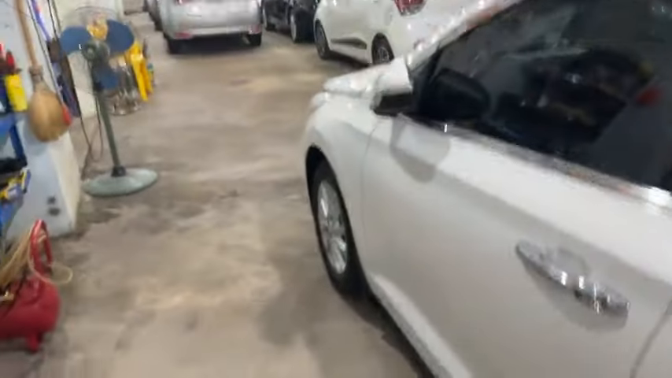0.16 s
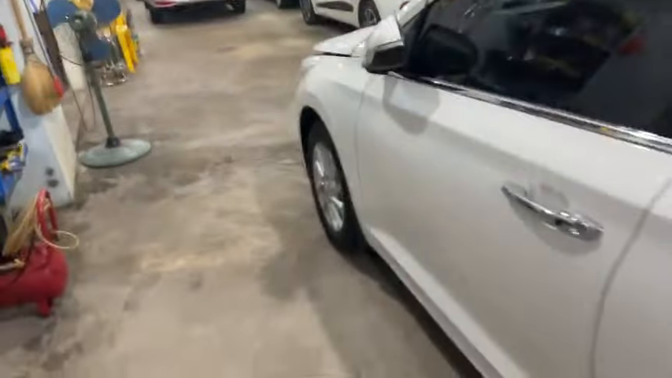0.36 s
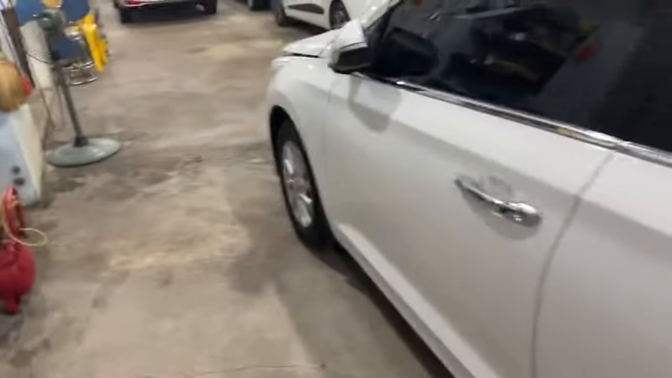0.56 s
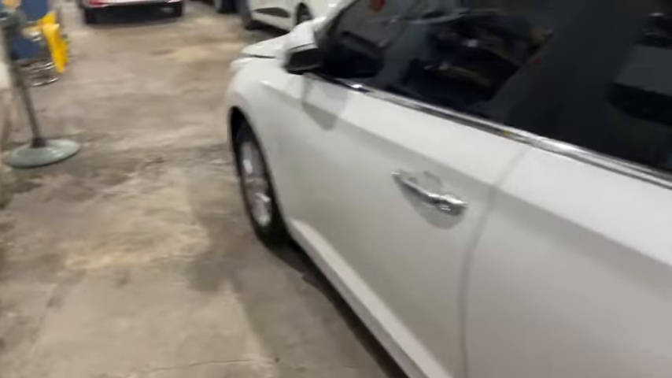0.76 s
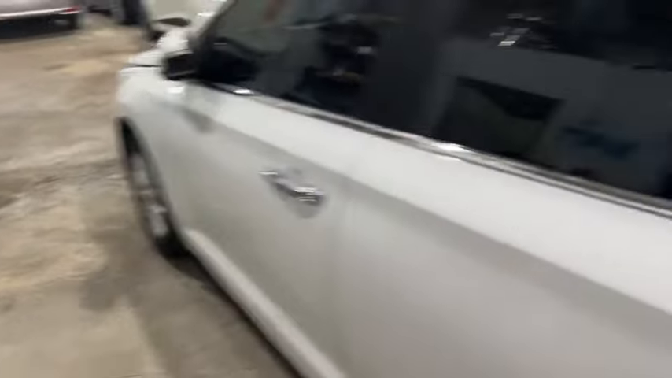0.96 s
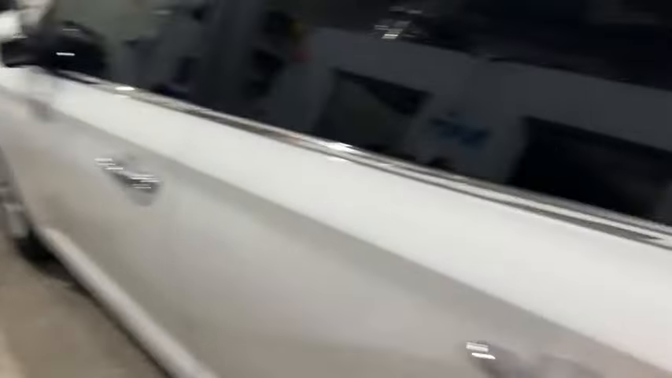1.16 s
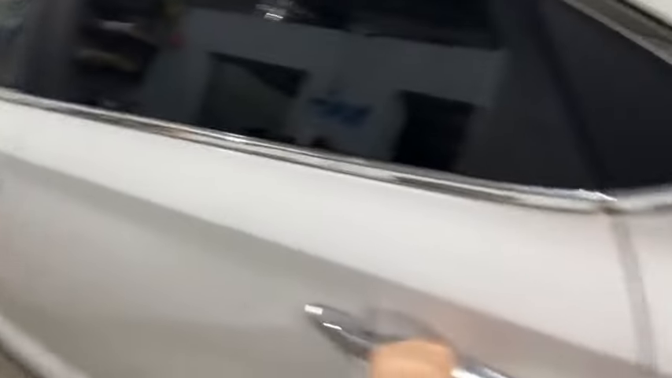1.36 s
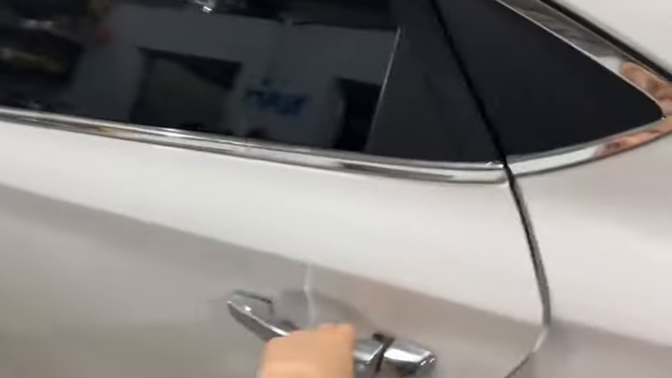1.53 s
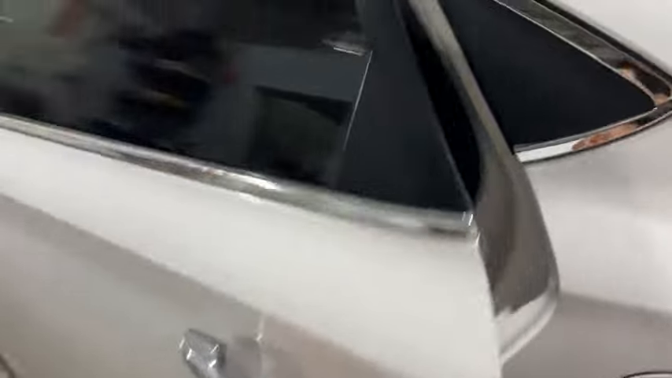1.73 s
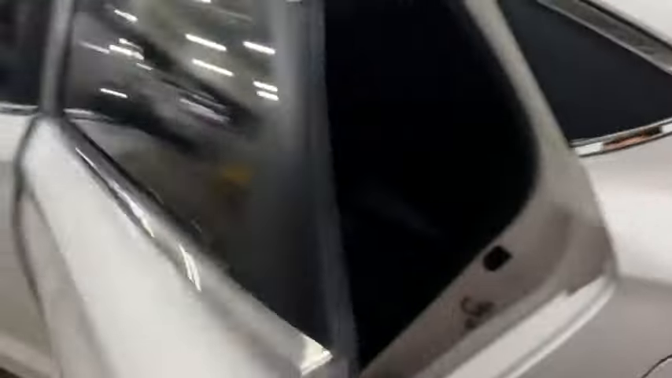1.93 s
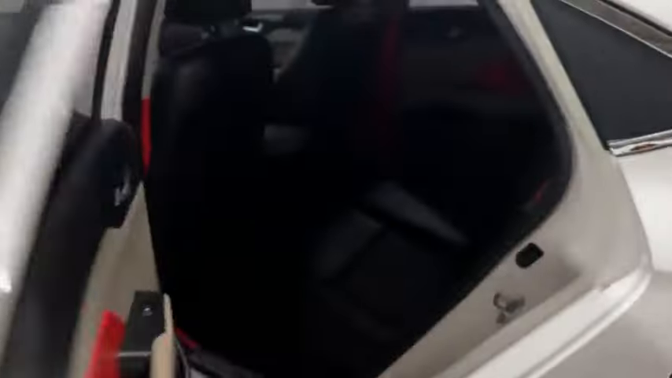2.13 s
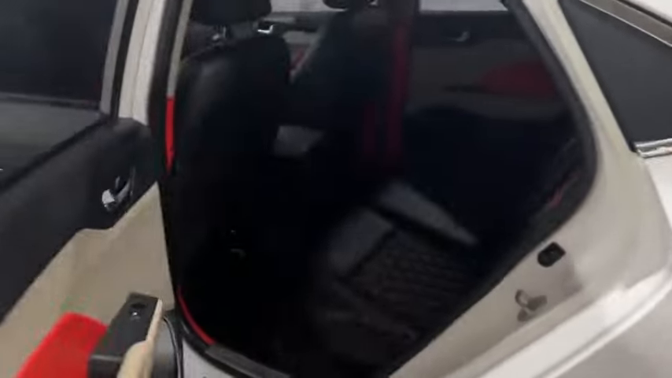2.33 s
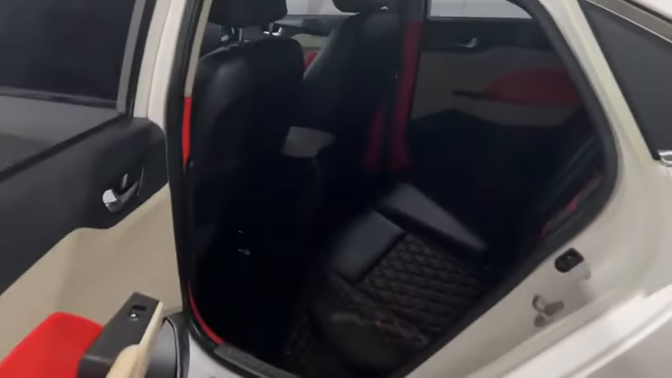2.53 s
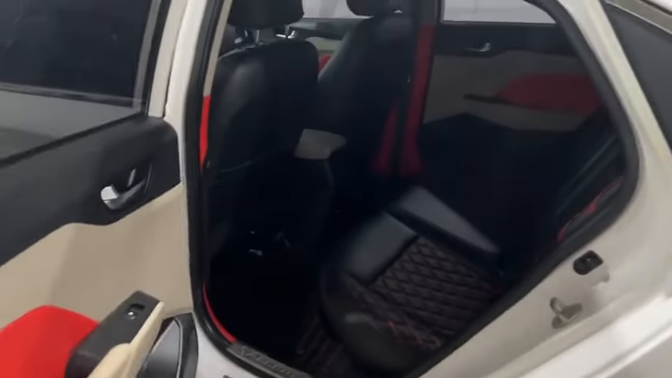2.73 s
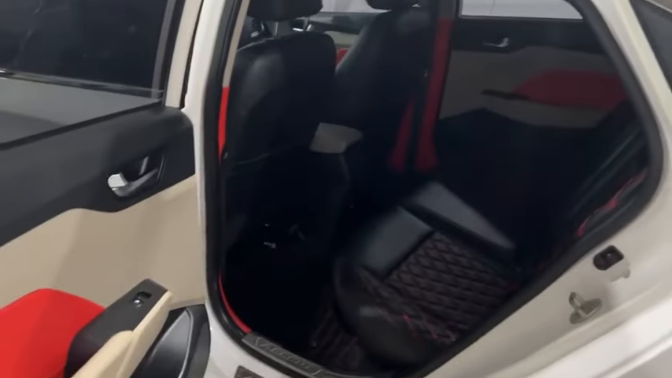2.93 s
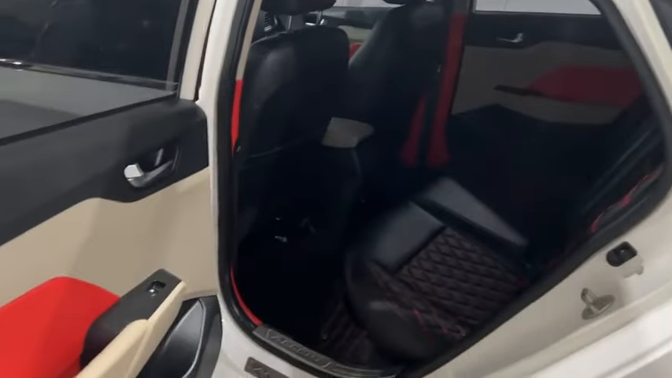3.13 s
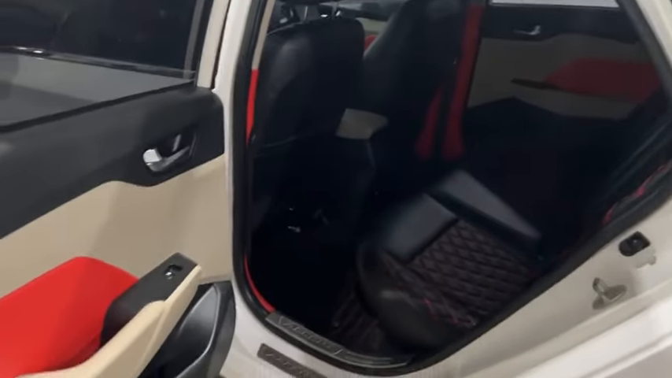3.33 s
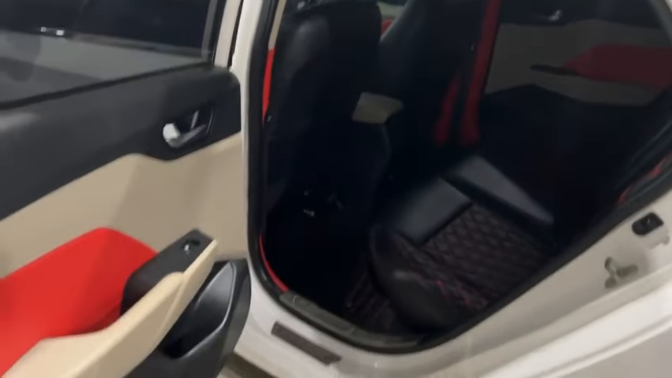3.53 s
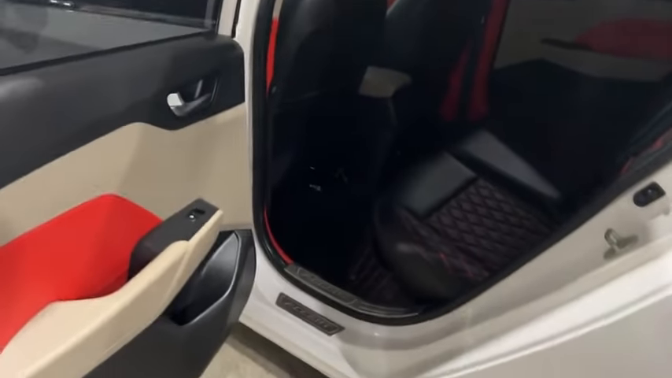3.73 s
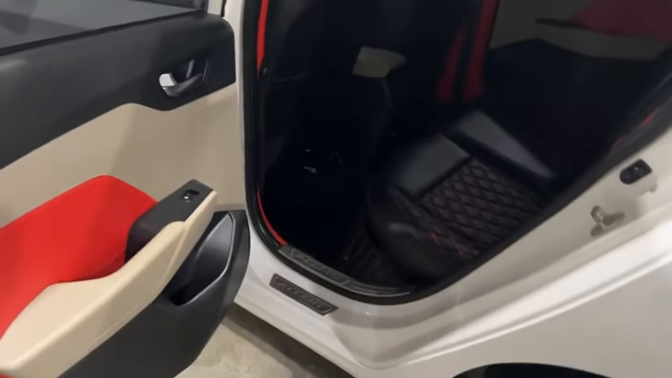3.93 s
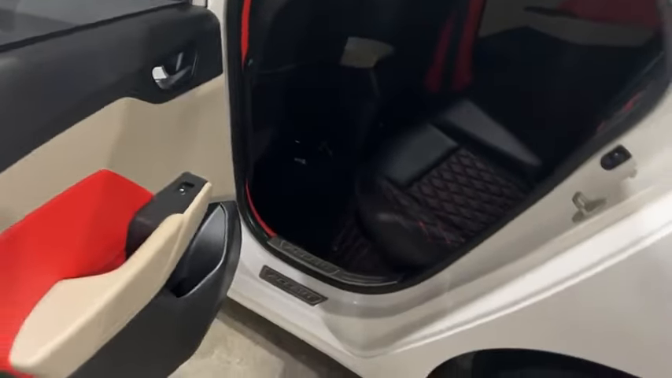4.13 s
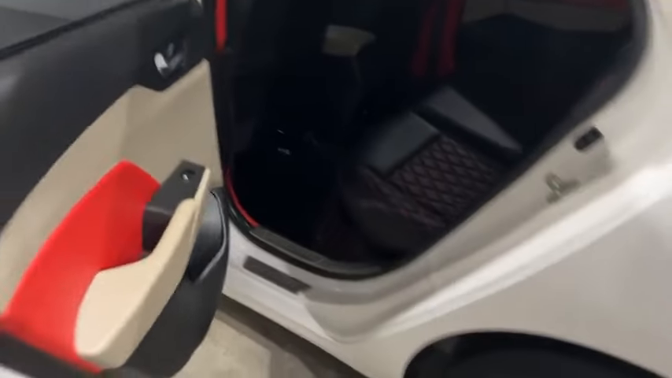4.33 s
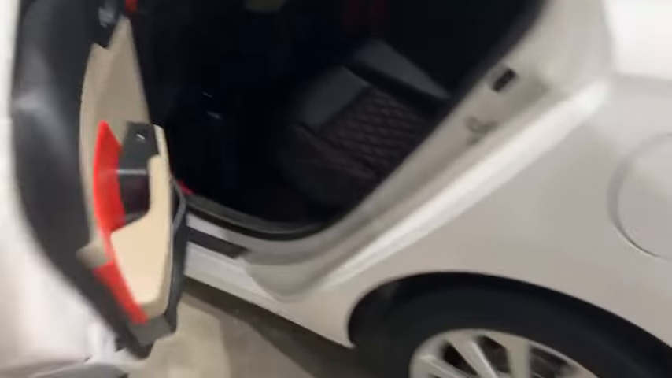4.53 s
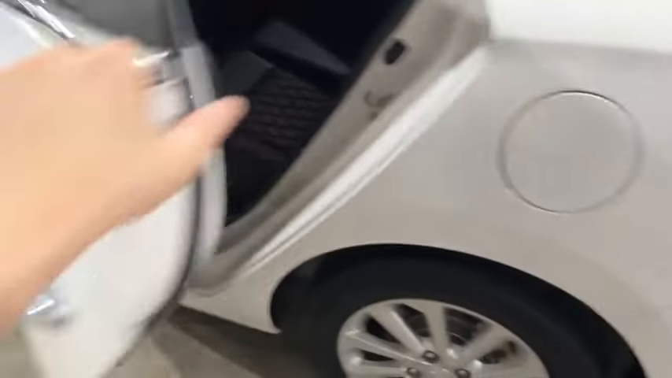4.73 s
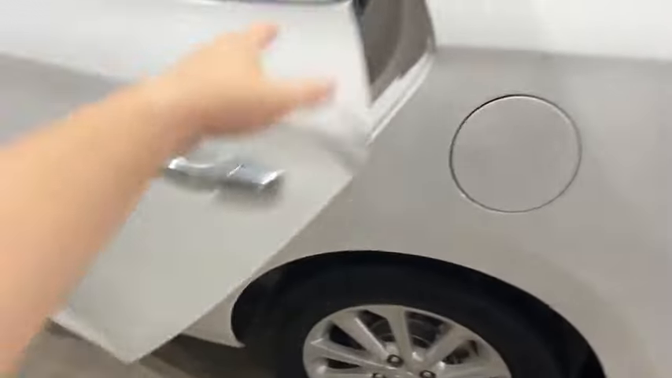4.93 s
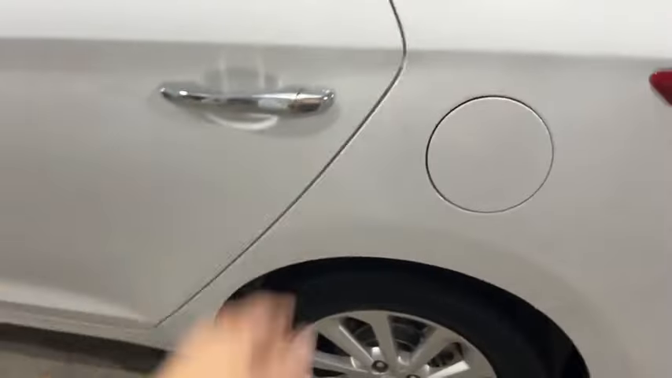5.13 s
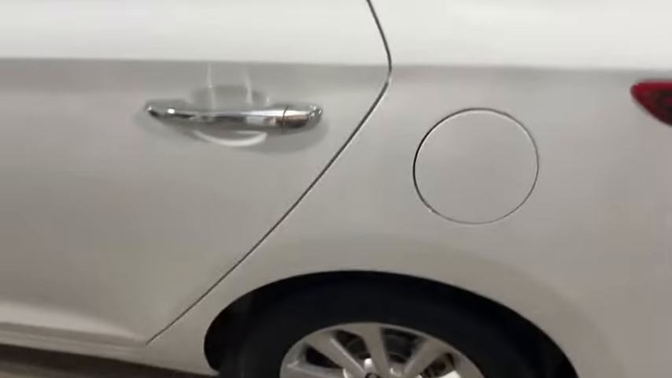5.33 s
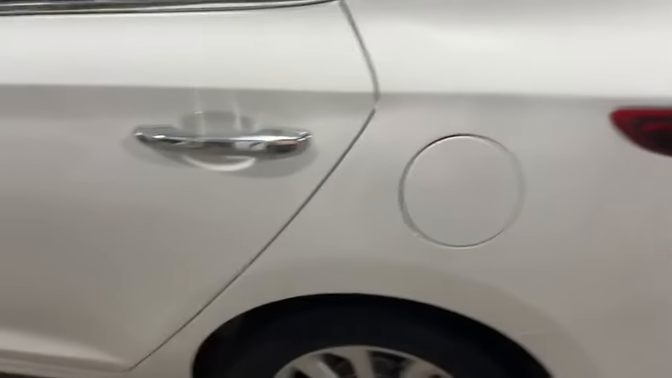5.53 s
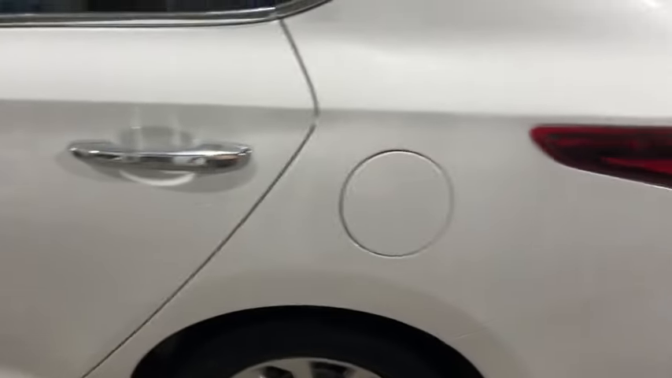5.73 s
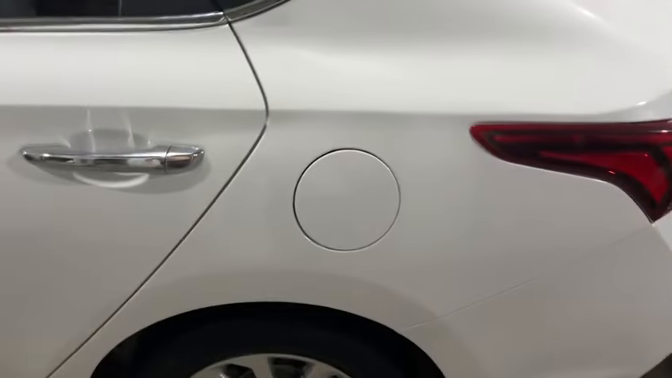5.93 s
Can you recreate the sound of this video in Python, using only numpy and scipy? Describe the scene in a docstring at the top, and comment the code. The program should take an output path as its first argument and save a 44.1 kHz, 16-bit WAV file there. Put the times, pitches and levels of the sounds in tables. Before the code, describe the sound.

A car door thuds shut in a covered lot; another unlatches, clacks against its stop, then slams harder with a bright metallic latch snap.

```python
"""Car doors in a covered lot

A car's front door is shut; the rear door is unlatched, swings against its stop and is slammed.
Each slam is the same quick run of blows (seal, latch, frame), stretched when the door moves slower.
Blows ring dying sines in the metal, crack noise in the trim and latch, and stir a diffuse echo of the hall.
The hinge rubs with band noise and groans with two climbing partials.
Behind them are a sine hum that comes and goes, the noise wash of the hall, faint high noise and a thin hiss."""
import sys
import numpy as np
from scipy import signal
from scipy.fft import rfft, irfft, next_fast_len
from scipy.io import wavfile
from scipy.ndimage import uniform_filter1d

SR = 44100
rng = np.random.default_rng(int(sys.argv[2]) if len(sys.argv) > 2 else 0)


def store_wav(level_fs):
    """Save 16-bit WAV to argv[1]."""
    pcm = np.round(np.clip(np.atleast_2d(level_fs), -1, 1) * 32767)
    wavfile.write(sys.argv[1], SR, pcm.T.astype(np.int16))


N = 267687
TIME = np.arange(N) / SR  # s

# front door, then rear door: (latch catches at t/s, time stretch, push trim/dB, clatter trim/dB, click trim/dB)
SLAMS = [(.0492, 1.25, -2.5, -1.5, -2.5), (5.2858, 1.0, 0.5, 0.2, 1)]


def amp(db):
    """Decibels to gain."""
    return 10 ** (np.asarray(db) / 20)


def evened(x):
    """Scales to rms 1."""
    return x / np.sqrt(np.mean(x ** 2) + 1e-20)


def read(points, hz):
    """Reads a table of (f/Hz, value) along a log-frequency axis."""
    f, value = np.transpose(points)
    return np.interp(np.log(hz + 1), np.log(f + 1), value)


def add(mix, s, sound):
    """Mixes a sound in at s seconds."""
    part = mix[max(round(s * SR), 0):][:len(sound)]
    part += sound[:len(part)]


def noise(gain):
    """Noise of rms 1 whose spectrum is the function gain(Hz)."""
    size = next_fast_len(N)
    spectrum = rfft(rng.standard_normal(size))
    shaped = spectrum * gain(np.fft.rfftfreq(size, 1 / SR))
    return evened(irfft(shaped, size)[:N])


def drift(width_hz):
    """Random wander of rms 1, its speed set by the width of its low-pass."""
    return noise(lambda f: np.exp(-(f / width_hz) ** 2))


def swells(rows, rise_s, fall_s):
    """Gain of sounds that ease in, hold and ease out; rows are (start/s, length/s, level/dB)."""
    def ease(u):
        return np.sin(np.pi / 2 * np.clip(u, 0, 1)) ** 2
    return sum(amp(db) * ease((TIME - s) / rise_s) * ease((s + length - TIME) / fall_s)
               for s, length, db in rows)


def wash():
    """Steady noise wash of the hall with a slight flutter in level."""
    # colour of the wash ahead of its treble roll-off: (f/Hz, level/dB)
    wash_colour = [(15, -42), (25, -35), (35, -16), (54, -4), (106, 3.5), (128, -10), (257, -4), (475, -13),
                   (1030, -16.5), (3260, -26), (5010, -12), (6200, -37), (7480, -26), (8550, -43),
                   (15000, -62)]
    rumble = noise(lambda f: amp(read(wash_colour, f)) / (1 + (f / 3800) ** 6))
    return amp(-57.5) * rumble * amp(0.26 * drift(20))


def side_noise():
    """Brighter noise along the car's side; it sinks as the listener steps behind the open door."""
    # colour of the side noise: (f/Hz, level/dB)
    side_colour = [(40, -47), (90, -6), (270, 3), (500, -6.5), (1000, -8), (1800, -16.5), (3000, -24.5),
                   (6000, -26.5), (9000, -46.5), (14000, -54)]
    start_s, takes_s, drop_db = 1.61, 2.05, -11
    screened = np.clip((TIME - start_s) / takes_s, 0, 1)
    level = amp(-50.5 + drop_db * screened + 1.4 * drift(34))
    return level * noise(lambda f: amp(read(side_colour, f)))


def hum():
    """A low sine with wandering phase; swells rise over a quiet floor."""
    # swells of the hum: (start/s, length/s, level/dB)
    hum_swells = [(-.05, .45, -44.5), (.4, 0.19, -43), (.53, 0.696, -47.5), (1.37, 0.69, -55.5)]
    tone = evened(np.sin(2 * np.pi * 57.5 * TIME + 0.5 * drift(4.8)))
    return (amp(-66) + swells(hum_swells, rise_s=0.11, fall_s=0.2)) * tone


def drone():
    """Machinery far off: very narrow bands of low noise."""
    # bands of the machinery: (f/Hz, level/dB)
    drone_bands = [(84, -66), (167, -66.5), (255, -67.5)]
    return sum(amp(db) * noise(lambda f: np.exp(-((f - hz) / 7) ** 2)) for hz, db in drone_bands)


def hiss():
    """A thin, high hiss: bell-shaped bands of noise."""
    # bands of the hiss: (f/Hz, spread/Hz, level/dB)
    hiss_bands = [(4920, 372, -65), (7390, 333, -64.5), (9430, 280, -86)]
    return sum(amp(db) * noise(lambda f: np.exp(-.5 * ((f - hz) / spread) ** 2))
               for hz, spread, db in hiss_bands)


def high_noise():
    """Faint noise around 12 kHz that swells and fades over a lower floor."""
    # the swells: (start/s, length/s, level/dB)
    high_noise_swells = [(.09, .33, -77), (.83, 0.33, -73), (1.55, .27, -76), (2.1, 0.39, -74),
                         (2.86, .27, -89)]
    treble = noise(lambda f: np.exp(-((f - 12000) / 3500) ** 2))
    return (amp(-95) + swells(high_noise_swells, rise_s=0.13, fall_s=0.16)) * treble


def background():
    """Everything that sounds behind the doors."""
    return wash() + side_noise() + hum() + drone() + hiss() + high_noise()


def colour(x, spectrum, size=4096):
    """Minimum-phase filter with the given spectrum, so that attacks stay sharp."""
    log_gain = np.log(amp(read(spectrum, abs(np.fft.fftfreq(size, 1 / SR)))))
    taps = np.fft.ifft(np.exp(np.conj(signal.hilbert(log_gain)))).real
    return signal.oaconvolve(x, taps[:size // 2])[:N]


def ring(force, modes):
    """Dying sines set off by a force; the rubber seal and trim choke their late ring."""
    t = TIME[:SR]
    free = sum(amp(db) * np.exp(-np.log(1000) * t / t60) * np.sin(2 * np.pi * hz * t)
               for hz, db, t60 in modes)
    choke_s = .2
    return signal.oaconvolve(force, free * np.exp(-(t / choke_s) ** 2))[:N]


def burst(decay_s, after_db, after_s, rise_s, size=8192):
    """A grainy crack of noise followed by a weaker, lumpy rattle; energy 1."""
    t = TIME[:size]
    lumps = amp(3.5 * evened(uniform_filter1d(rng.standard_normal(size), size=110)))
    fade = np.exp(-t / decay_s) + amp(after_db) * np.exp(-t / after_s)
    shape = fade * (1 - np.exp(-t / rise_s)) * lumps
    return rng.standard_normal(size) * shape / np.linalg.norm(shape)


def door(blows, modes, rattle_s, click_s, steel_db, bright_hz):
    """Every blow pushes the panel, shakes the trim and clicks the latch."""
    # colour of the trim's clatter: (f/Hz, level/dB)
    clatter_colour = [(40, -40.5), (150, 1.5), (330, 3.5), (480, -1.5), (780, -1.5), (980, -5.5),
                      (1400, -14), (1900, -18.5), (2800, -17.5), (4300, -23.5), (6500, -28.5),
                      (9000, -46.5), (15000, -59)]
    # colour of the latch's click: (f/Hz, level/dB)
    click_colour = [(200, -34), (1200, 2.5), (3000, -12), (5500, -5), (7000, -10), (9500, -16.5),
                    (11000, -28.5), (16000, -37)]
    # ring of the latch's steel: (f/Hz, level/dB, t60/s before the choke)
    latch_modes = [(2760, -21, 0.086), (3030, -36, 0.088), (2850, -21, 0.11), (4430, -18.5, 0.044)]
    push, trim, click, steel = np.zeros((4, N))
    t = TIME[:2048]
    for s, push_db, contact_ms, trim_db, click_db in blows:
        u = t * 1000 / (contact_ms / 2)  # the push peaks at half the contact time
        pulse = u * np.exp(-u)  # a longer contact reaches only the low modes
        add(push, s, amp(push_db) * pulse / pulse.sum())
        add(trim, s, amp(trim_db) * burst(decay_s=rattle_s, after_db=-11, after_s=0.045, rise_s=0.0005))
        add(click, s, amp(click_db) * burst(decay_s=click_s, after_db=-19.5, after_s=0.043, rise_s=0.00073))
        add(steel, s, amp([click_db]))  # a single-sample tap
    panel = ring(push, modes) + amp(25) * colour(trim, clatter_colour)
    latch = amp(13) * colour(click, click_colour) + amp(steel_db) * ring(steel, latch_modes)
    # the door's edge shades the latch's treble
    shade = signal.butter(2, min(bright_hz, 20000), fs=SR, output="sos")
    return panel + signal.sosfilt(shade, latch)


def shut(s, stretch, push_db, trim_db, click_db):
    """The blows of one slam: the shared stages at this door's pace and strength."""
    # seal touches, latch catches, rides over the striker, door seats, latch snaps home, frame takes the load,
    # door rocks back: (t/s from the catch, unstretched, push/dB, contact/ms, trim clatter/dB, latch click/dB)
    stages = [(-.0105, -23.5, 0.71, -18, -46), (0, -11, 0.17, -4, -19), (.0032, -7.5, 0.36, -5.5, -23),
              (.0082, 0.5, 0.71, -28, -34), (0.0243, -15.5, 0.22, -9.5, -14.5), (.032, -5.5, 1, -15.5, -26),
              (0.0379, -10, 5.8, -14.5, -28)]
    return [(s + stretch * after_s, push + push_db, contact_ms, trim + trim_db, click + click_db)
            for after_s, push, contact_ms, trim, click in stages]


def front_slam():
    """The front door shuts at a slower pace, its latch well shaded."""
    # ring of the front door and the cabin behind it: (f/Hz, level/dB, t60/s before the choke)
    front_modes = [(51, -22, 0.62), (71.3, -25, 0.45), (92.4, -22, 0.41), (130.2, -20.5, 0.31),
                   (163, -28, 0.42), (247.4, -24, 0.7), (290, -25.5, 0.12), (329, -19.5, 0.15),
                   (401, -20, 0.31), (523, -23, 0.12), (670, -13.5, 0.047), (770, -24, 0.09),
                   (853, -30, 0.13), (1070, -31, .1)]
    return door(shut(*SLAMS[0]), front_modes, rattle_s=0.0056, click_s=0.014, steel_db=-17, bright_hz=7040)


def hall(x):
    """A diffuse tail that builds up briefly, each band dying at its own speed."""
    # decay of the hall: (f/Hz, t60/s)
    hall_decay = [(50, 0.93), (150, 0.66), (400, 0.7), (1000, 0.78), (2500, 1), (6000, 0.82), (14000, 0.41)]
    # colour of the echo: (f/Hz, level/dB)
    echo_colour = [(40, -18), (120, -8.5), (300, -11.5), (900, -12.5), (2500, -12), (6000, -6.5),
                   (14000, -5)]
    hz, t, z = signal.stft(rng.standard_normal(SR), SR, nperseg=512)
    t60 = read(hall_decay, hz)[:, None]
    even_energy = np.sqrt(2 * np.log(1000) / (t60 * SR))  # long bands get no extra energy
    fade = np.exp(-np.log(1000) * t / t60) * even_energy
    bands = z * fade * amp(read(echo_colour, hz))[:, None]
    tail = signal.istft(bands, SR, nperseg=512)[1][:SR]
    build_up = 1 - np.exp(-TIME[:SR] / 0.0044)
    return signal.oaconvolve(x, tail * build_up)[:N]


def bumps():
    """Light knocks push the rear panel but hardly shake the trim or the latch."""
    # the knocks: (t/s, push/dB, contact/ms)
    knocks = [(2.163, -22.5, 1.4), (2.61, -22, 5.6), (2.809, -39, 4.2), (5.605, -28.5, 3.5)]
    trim_db, click_db = -52, -64
    return [(s, db, contact_ms, trim_db, click_db) for s, db, contact_ms in knocks]


def rear_opening():
    """The rear latch lets go; these blows, and light knocks then and later, all ring with the free door's modes."""
    # the handle is pulled, the latch lets go and the seal peels off:
    # (t/s, push/dB, contact/ms, trim clatter/dB, latch click/dB)
    opening_blows = [(1.588, -33, 0.87, -33, -62), (1.6645, -13, 0.16, -21.5, -25),
                     (1.6732, -22, 0.8, -22.5, -26), (1.6925, -21, 1.26, -19, -29)]
    # ring of the free rear door: (f/Hz, level/dB, t60/s before the choke)
    free_modes = [(64.5, -33, 0.4), (84.8, -23, 0.66), (147, -10.5, 0.25), (214, -20, 0.12),
                  (255.5, -16, 0.21), (382, -14.5, 0.088), (654, -23.5, 0.13), (838, -18, 0.062),
                  (1120, -23, 0.042), (1370, -11.5, 0.022), (1610, -49, 0.088)]
    return door(opening_blows + bumps(), free_modes,
                rattle_s=0.014, click_s=0.0017, steel_db=-27, bright_hz=15000)


def hinge_stop():
    """The door hits its hinge stop, and later knocks softly as it swings shut."""
    # blows on the stop: (t/s, push/dB, contact/ms, trim clatter/dB, latch click/dB)
    stop_blows = [(2.135, -22, 0.023, -19, -8), (2.1383, -14, 0.22, -19, -43),
                  (2.1414, -15, 0.16, -28, -43), (2.1635, -28, 0.21, -25, -35),
                  (5.213, -26, 0.96, -50, -70)]
    # ring of the stop and its bracket: (f/Hz, level/dB, t60/s before the choke)
    stop_modes = [(256, -27, 0.045), (320, -39, 0.018), (393, -12.5, 0.064), (455, -19, 0.035),
                  (664, -23.5, 0.045), (830, -11, 0.079), (1030, -12.5, 0.043), (1217, -20, 0.076),
                  (1490, -43, .04), (4100, -20, 0.025), (5350, -17, 0.022), (5700, -11, 0.017)]
    return door(stop_blows, stop_modes, rattle_s=0.0036, click_s=0.0026, steel_db=-19, bright_hz=17000)


def hinge():
    """A dry noise rub as the door settles open, and a faint groan that climbs as it swings shut."""
    # the rub: (start/s, length/s, level/dB)
    rub_swell = (2.2, 0.32, -61)
    # how the door carries the groan: (f/Hz, level/dB)
    groan_body = [(230, -16), (270, -11), (300, 2.5), (325, -1), (470, -11.5), (540, -11.5), (630, -18)]
    scrape = noise(lambda f: 1 / (1 + ((f - 1660) / 230) ** 4))
    rub = swells([rub_swell], rise_s=.07, fall_s=0.081) * amp(2.4 * drift(50)) * scrape

    start_s, length_s, groan_db = 4.82, .27, -45.5
    base_hz, climb_hz = 226.6, 93.7
    since = np.clip(TIME - start_s, 0, length_s)
    hz = base_hz + climb_hz * np.sin(np.pi / 2 * since / length_s) ** 2
    turns = np.cumsum(hz * (1 + 0.014 * drift(63))) / SR  # the pitch trembles
    partials = sum(amp(read(groan_body, k * hz)) * np.sin(2 * np.pi * k * turns) for k in (1, 2))
    groan_gain = swells([(start_s, length_s, groan_db)], rise_s=.06, fall_s=.1)
    return rub + groan_gain * amp(2.2 * drift(60)) * partials


def rear_slam():
    """The rear door is slammed, faster and harder, with a brighter latch."""
    # ring of the shut rear door and the cabin behind it: (f/Hz, level/dB, t60/s before the choke)
    rear_modes = [(63, -21, 0.75), (100.8, -24.5, 1), (137, -22.5, 0.26), (164, -25, 0.2), (195, -24, 0.17),
                  (237, -18, 0.072), (270, -13.5, 0.091), (308.6, -23, 0.23), (359, -27.5, 0.28),
                  (390, -19, 0.27), (533, -17, 0.085), (660, -35, 0.028), (738, -21, 0.15),
                  (880, -19, 0.049), (930, -13.5, 0.057), (1070, -43, 0.038), (1322, -20.5, 0.15)]
    return door(shut(*SLAMS[1]), rear_modes, rattle_s=0.0037, click_s=0.0017, steel_db=-5.5, bright_hz=11000)


def scene():
    """Both doors in the hall, over the background; the hinge's rub and groan stay dry."""
    front = front_slam()
    opening = rear_opening()
    stop = hinge_stop()
    slam = rear_slam()
    echo = hall(amp(-2.5) * front + amp(-3.0) * (opening + stop) + amp(-1.0) * slam)
    return (front + opening + stop + slam + hinge() + echo + background())[None]


def record(dry):
    """The microphone's bass roll-off, then the band limit."""
    thinned = signal.sosfilt(signal.butter(4, 42, "highpass", fs=SR, output="sos"), dry)
    band_limit = signal.firwin(511, 15800, window=("kaiser", 9), fs=SR)  # low-pass, cutoff in Hz
    return signal.oaconvolve(thinned, band_limit[None], "same")


dry = scene()
out = record(dry)
store_wav(out)
```